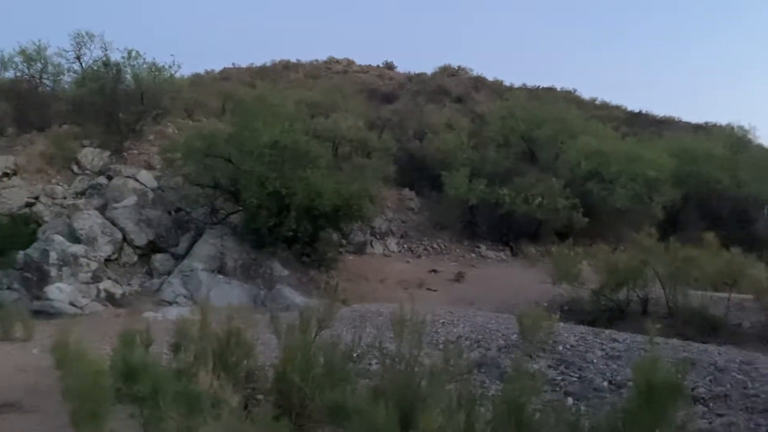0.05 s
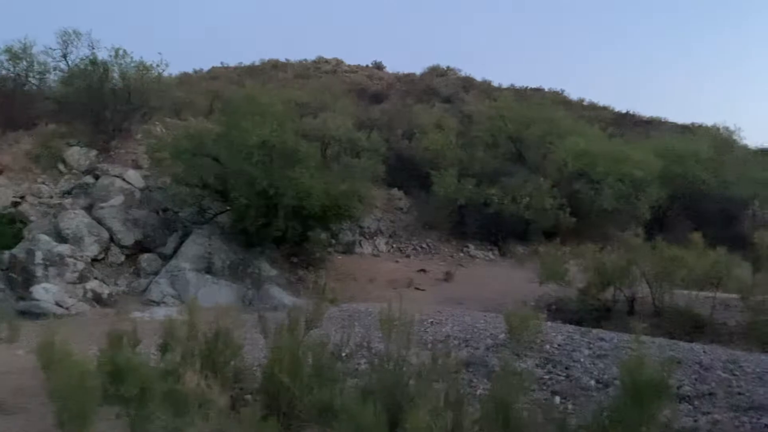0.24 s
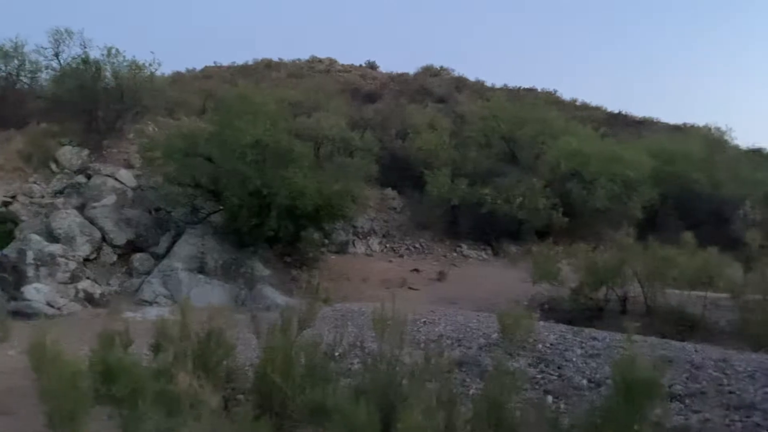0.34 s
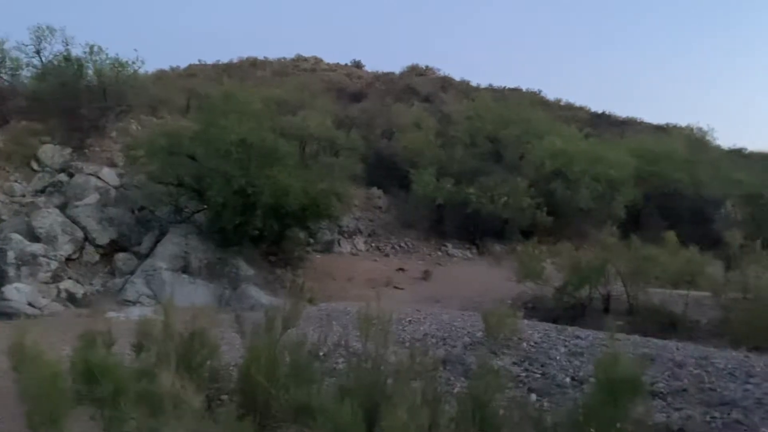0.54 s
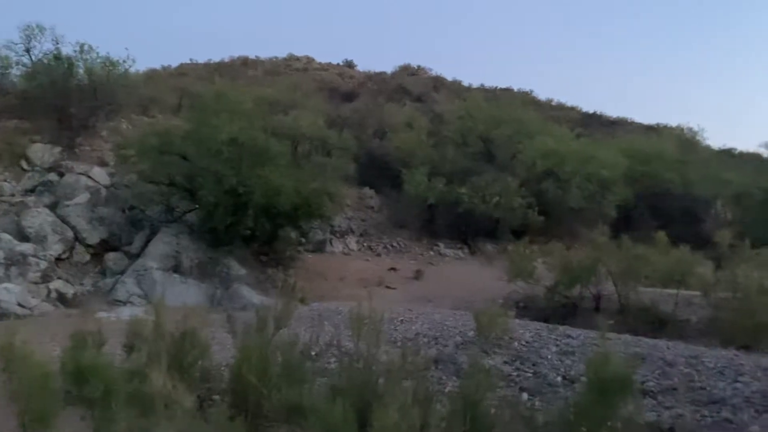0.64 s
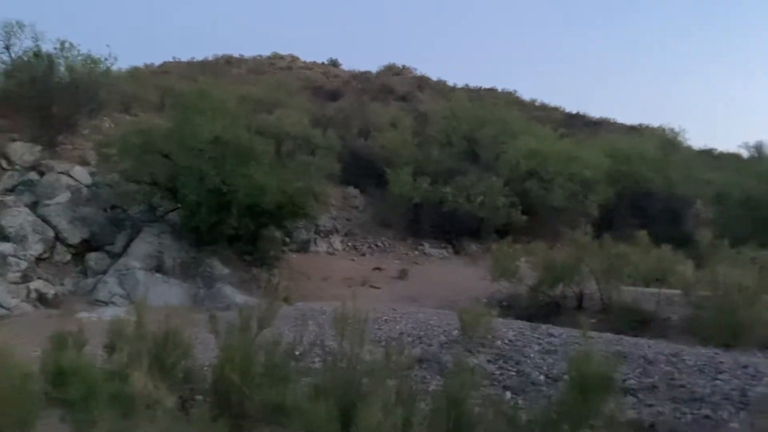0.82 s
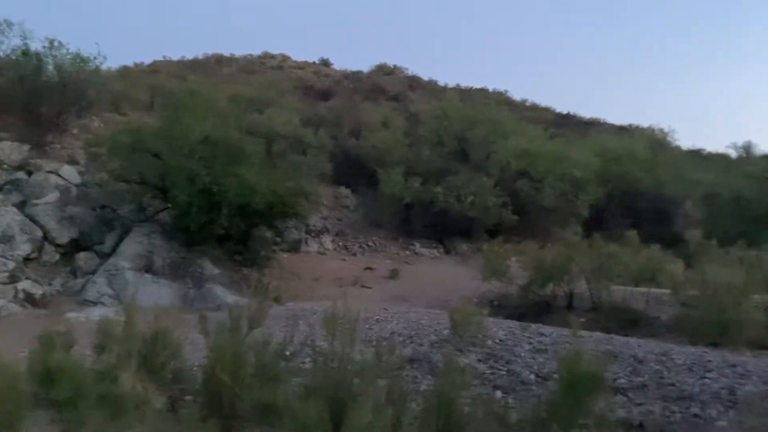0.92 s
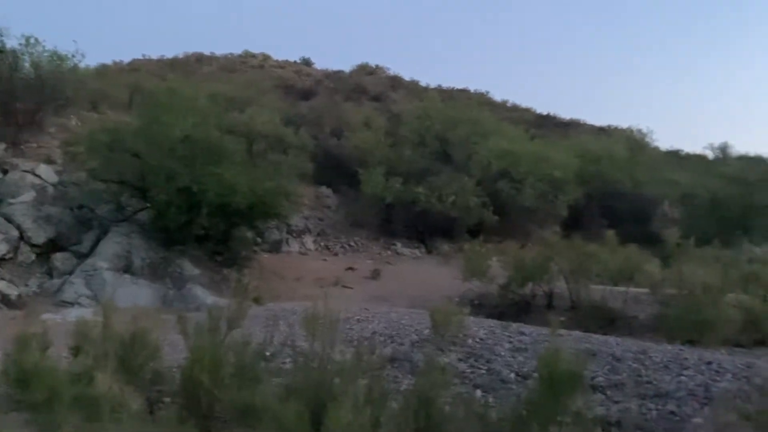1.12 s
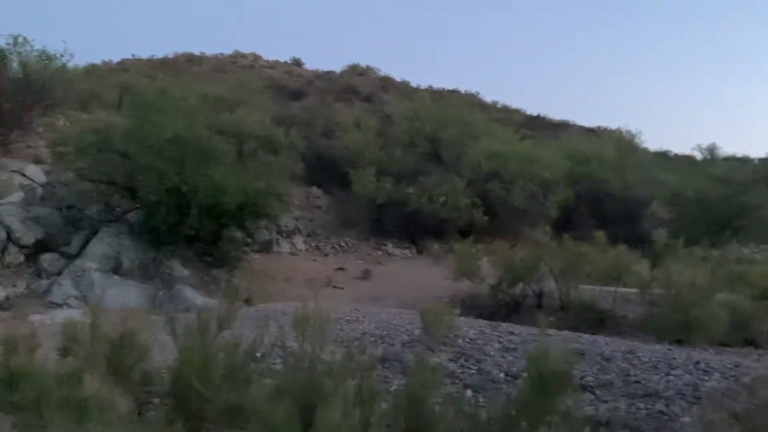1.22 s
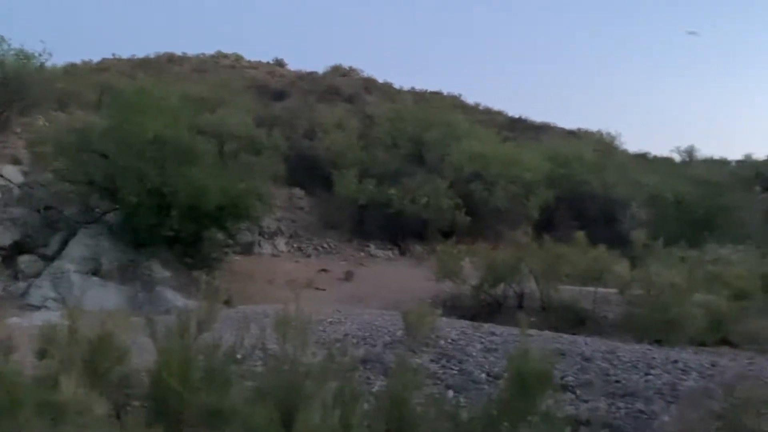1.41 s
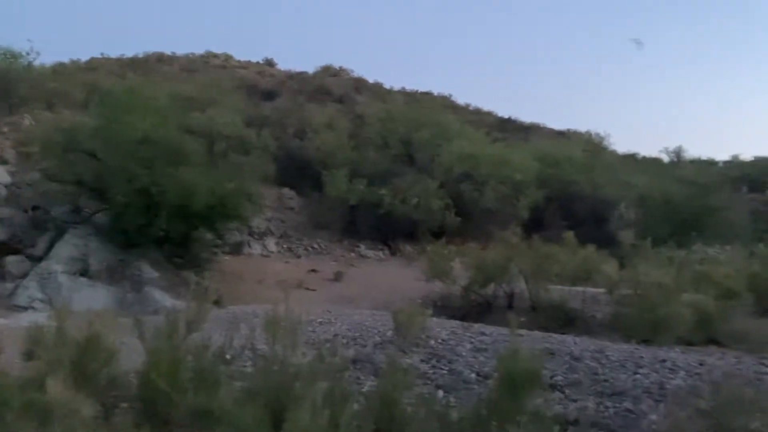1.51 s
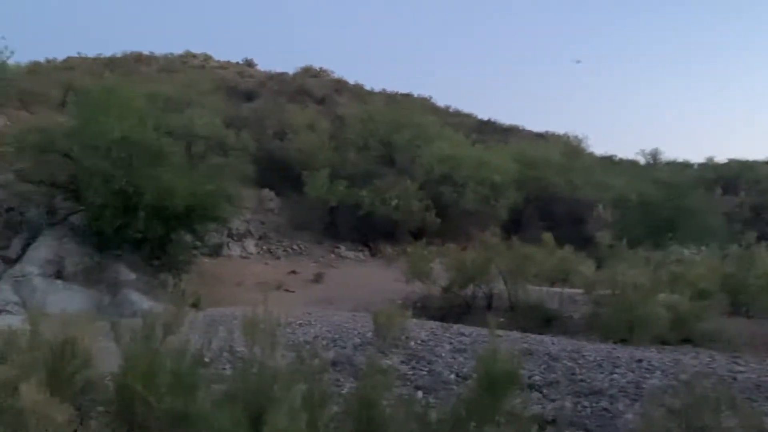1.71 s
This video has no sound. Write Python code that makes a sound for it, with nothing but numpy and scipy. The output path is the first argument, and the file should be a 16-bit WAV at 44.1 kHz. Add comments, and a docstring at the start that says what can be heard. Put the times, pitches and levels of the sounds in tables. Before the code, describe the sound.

Low rumble and dull bumps of a hand-held microphone, with a faint distant nightjar whistling short notes

```python
"""Low rumble and soft bumps of a turning hand-held microphone run throughout, over faint still air, at dusk on a
desert hillside. A nightjar some way off whistles short gliding tones that deepen from a downward slur into
a V, then three chirps that mainly rise; delayed copies and decaying noise give the echoes of rocks and scrub.
Enveloped noise bands make faint high ticks (insects or a bat) and scuffs; the knocks are short sagging sines
with rubbing noise, and one decaying pulse is a snap of the handled case."""
import sys
import numpy as np
from scipy import signal
from scipy.fft import rfft, irfft
from scipy.io import wavfile

SR = 44100
rng = np.random.default_rng(int(sys.argv[2]) if len(sys.argv) > 2 else 0)


def to_wav(sig):
    """Store sig (one row per channel, or 1-D mono) as 16-bit WAV at the path in sys.argv[1].

    Samples outside -1..1 are clipped; the rate is SR.
    """
    pcm = np.clip(np.atleast_2d(sig), -1, 1) * 32767
    pcm = np.round(pcm).astype(np.int16)
    wavfile.write(sys.argv[1], SR, pcm.T)  # frames by channels


N = 77175  # samples

# relative spectrum of the upper rumble, also of the rubbing in the bumps: f/Hz, density/dB per Hz
UPPER_SPECTRUM = [(60, -18.5), (135, 4.5), (210, -1.5), (310, -6.5), (420, -12), (550, -23), (700, -34.5),
                  (1000, -58.5), (2000, -93)]
UPPER_SIDE_DB = -2  # opposed part relative to the shared part


def undb(db):
    """Level definition: an amplitude gain is 10 to the power dB/20."""
    return 10 ** (np.asarray(db) / 20)


def pan(db):
    """Intensity stereo: a level difference places the sound, positive towards the left."""
    return undb(np.array([[db], [-db]]) / 2)


def ease(u):
    """Raised-cosine transition: a smooth step from 0 to 1 as u goes from 0 to 1."""
    return np.sin(np.pi / 2 * np.clip(u, 0, 1)) ** 2


def delay(x, seconds):
    """Propagation delay: the same waveform arrives later, interpolated between samples."""
    return np.interp(np.arange(N) - seconds * SR, np.arange(N), x, left=0)


def lowpass(x, hz):
    """Fourth-order Butterworth filtering: attenuation grows steeply above the cutoff."""
    return signal.sosfilt(signal.butter(4, hz, fs=SR, output="sos"), x)


def waver(hz):
    """Band-limited random modulation: low-passed noise of standard deviation 1."""
    y = lowpass(rng.standard_normal(N), hz)
    return y / y.std()


def noise(spectrum):
    """Spectral shaping: white noise weighted by (f/Hz, level/dB) points, scaled to rms 1."""
    hz, db = np.array(spectrum).T
    f = np.maximum(np.arange(N // 2 + 1) * SR / N, 1)
    gain = undb(np.interp(np.log(f), np.log(hz), db))
    y = irfft(rfft(rng.standard_normal(N)) * gain, N)
    return y / y.std()


def wide(spectrum, side_db):
    """Partial interchannel correlation: a shared noise plus one of opposite sign in the two channels."""
    shared = noise(spectrum)
    opposed = noise(spectrum) * np.array([[1], [-1]])
    return shared + undb(side_db) * opposed


def still_air():
    """Stationary broadband noise: a faint diffuse background of constant level."""
    # relative spectrum: f/Hz, density/dB per Hz
    air_spectrum = [(100, 1), (400, 7), (800, -2), (1400, -8.5), (2500, -10.5), (4000, -15), (7500, -18),
                    (9000, -28), (10500, -17), (12000, -18.5), (13500, -31), (16000, -51)]
    return undb(-80) * wide(air_spectrum, side_db=-1)


def rumble(t):
    """Amplitude-modulated noise: air and handling excite a deep band and a fluttering upper band."""
    # level curves before the band trims: t/s, deep level/dB, upper level/dB
    level_curves = [(0.0, -54.5, -59), (0.146, -61.5, -78.5), (0.218, -48.5, -44.5), (0.34, -45.5, -61),
                    (0.588, -42.5, -35.5), (0.74, -35.5, -44), (0.774, -51, -28.5), (0.876, -36.5, -34),
                    (0.964, -54.5, -78.5), (1.008, -41.5, -49), (1.282, -56, -87), (1.316, -62, -55),
                    (1.334, -48, -79), (1.394, -79, -84), (1.48, -41, -68), (1.516, -59.5, -83.5),
                    (1.68, -47.5, -66.5), (1.75, -50, -66)]
    # relative spectrum of the deep band: f/Hz, density/dB per Hz
    deep_spectrum = [(15, -24.5), (28, -11.5), (50, 12), (90, 6.5), (140, -4.5), (250, -15.5), (500, -68)]
    deep_trim_db, upper_trim_db = -1, -7
    flutter_db, flutter_hz = 4.5, 45.8  # standard deviation and highest rate

    s, deep_db, upper_db = np.array(level_curves).T
    flutter = flutter_db * waver(flutter_hz)
    deep_gain = undb(np.interp(t, s, deep_db) + deep_trim_db)
    upper_gain = undb(np.interp(t, s, upper_db) + upper_trim_db + flutter)
    deep = pan(1.5) * deep_gain * wide(deep_spectrum, side_db=-5.5)
    return deep + upper_gain * wide(UPPER_SPECTRUM, UPPER_SIDE_DB)


def bumps(t):
    """Damped transient oscillation: each dull knock of the hand swells, sags in pitch and dies away."""
    # knocks: onset t/s, level before the low-pass/dB, initial f/Hz, swell time/s, left-right/dB
    knocks = [(.028, -49, 178, .003, -2), (.211, -36.5, 198, 0.0022, -1), (0.224, -44.5, 141, 0.0029, -4),
              (0.268, -42.5, 62.6, 0.0052, -4), (.272, -42.5, 277, 0.0023, 0.5),
              (0.434, -39.5, 123, 0.004, 7.5), (.493, -40, 393, .0025, -2.5), (.561, -31, 89, 0.0041, -1),
              (.609, -35, 403, .003, 2), (.628, -31, 133, 0.0035, -1), (.771, -26, 395.5, 0.00094, 8),
              (0.7787, -18.5, 190, 0.0011, 1.5), (0.793, -24, 199, 0.0041, 0.5),
              (.814, -26.5, 140, .004, -3.5), (.827, -27.5, 400, 0.0014, 4),
              (0.847, -26, 159, 0.0042, -0.5), (.866, -35, 399, 0.0011, 4), (0.872, -27, 98.7, 0.0038, 4),
              (0.899, -41, 373, 0.0014, 2), (.998, -30, 259, 0.0021, 1), (1.042, -31, 216, 0.0021, -0.5),
              (1.092, -38, 233, 0.0018, -3), (1.113, -39.5, 150, 0.0028, 5.5),
              (1.144, -39.5, 104, 0.0035, 5.5), (1.178, -42.5, 171, 0.0027, -2),
              (1.317, -37, 70.2, .006, 5), (1.465, -42, 158.6, 0.0026, 6), (1.478, -46.5, 63.6, 0.006, 20),
              (1.553, -49, 142, 0.0042, 3.5), (1.684, -43.5, 238, .003, 7)]
    sag = 0.13  # pitch falls as 1 / (1 + sag * u)
    grit_db, grit_reach = -11.5, 1.68  # rubbing: level before filtering, cutoff as a multiple of initial pitch
    top_hz = 756

    out = np.zeros((2, N))
    grit = undb(grit_db) * wide(UPPER_SPECTRUM, UPPER_SIDE_DB)
    for start, db, hz, swell_s, side_db in knocks:
        u = np.maximum(t - start, 0) / swell_s
        cycles = hz * swell_s * np.log1p(sag * u) / sag  # integral of the sagging pitch
        knock = np.sin(2 * np.pi * cycles) + lowpass(grit, grit_reach * hz)
        envelope = (u / 2) ** 2 * np.exp(2 - u)  # peaks at 1 after two swell times
        out += pan(side_db) * undb(db) * envelope * knock
    return lowpass(out, top_hz)


def scuffs(t):
    """Decaying band noise: each faint brushing sound is a puff centred on one frequency."""
    # puffs: onset t/s, level/dB, centre f/Hz, decay time constant/s
    puffs = [(.201, -73, 1680, 0.0059), (0.2, -80, 3380, 0.0032), (1.173, -81.5, 1140, 0.03),
             (1.21, -77.5, 930, 0.018), (1.305, -75.5, 1230, 0.018)]
    attack_s = 0.002
    out = np.zeros((2, N))
    for start, db, hz, decay_s in puffs:
        u = np.maximum(t - start, 0)
        envelope = ease(u / attack_s) * np.exp(-u / decay_s)
        band = [(hz / 2, -25), (hz, 0), (2 * hz, -30)]
        out += undb(db) * envelope * wide(band, side_db=5)
    return out


def click(t):
    """Impulsive excitation: one snap of the handled case jumps at once and decays exponentially."""
    start, decay_s, level_db = 0.5733, 0.0008, -41
    pulse = (t >= start) * np.exp(-np.abs(t - start) / decay_s)
    return pan(6.8) * undb(level_db) * pulse


def ticks(t):
    """Double exponential decay: each thin high noise burst leaves a weaker, longer diffuse tail."""
    # bursts: onset t/s, level/dB, centre f/Hz, decay time constant/s
    bursts = [(0.599, -80, 10300, .004), (0.618, -72, 10900, 0.0018), (.709, -77.5, 10800, .004),
              (.725, -74, 14900, .003), (.7274, -71, 10800, .002), (.845, -69, 11150, 0.0021),
              (.9642, -85.5, 11260, 0.0094), (1.072, -73, 11600, 0.0079), (1.0914, -55, 10800, 0.0018),
              (1.216, -72, 11300, 0.0026), (1.3174, -70, 10800, 0.0022), (1.423, -78.5, 10500, 0.0033)]
    # relative spectrum of every burst: multiple of the centre f, density/dB per Hz
    burst_spectrum = [(.3, -35.5), (0.551, -19), (.82, -19), (.94, -2.5), (1.07, 0), (1.19, -17.5),
                      (1.45, -32.5)]
    attack_s, tail_decay_s, tail_db = 0.0013, 0.024, -24  # tail level is relative to the burst

    out = np.zeros((2, N))
    for start, db, hz, decay_s in bursts:
        u = np.maximum(t - start, 0)
        colour = [(multiple * hz, level) for multiple, level in burst_spectrum]
        tail = undb(tail_db) * np.exp(-u / tail_decay_s) * wide(colour, side_db=0.5)
        burst = np.exp(-u / decay_s) * wide(colour, side_db=-2)
        out += undb(db) * ease(u / attack_s) * (burst + tail)
    return out


def nightjar(t):
    """Frequency modulation: a nearly pure whistle glides to a turning pitch and on to its end pitch."""
    # notes: onset t/s, slide to the turn/s, slide after it/s, start f/Hz, turning f/Hz, end f/Hz,
    # mid-note level/dB, left-right/dB
    notes = [(0.027, 0.016, .006, 1760, 1500, 1600, -72, -4),
             (0.157, 0.017, 0.0027, 1845, 1490, 1490, -69.5, -3),
             (.284, .015, 0.0056, 2135, 1468, 1590, -69, -1),
             (0.4, 0.016, 0.0072, 2300, 1490, 1570, -68, -1.5),
             (0.505, 0.017, 0.01, 2580, 1600, 1730, -66.5, -2.5),
             (0.589, 0.02, .014, 2743, 1630, 2050, -63, -1),
             (0.697, 0.023, .017, 2840, 1690, 2050, -62, -2),
             (0.811, 0.026, 0.014, 2783, 1620, 2110, -62.5, -0.5),
             (0.933, .021, 0.021, 2797, 1656, 2160, -64, -2),
             (1.043, 0.024, 0.0043, 2850, 1882, 2030, -66.5, 1.5),
             (1.12, .018, 0.0062, 1652, 2285, 2460, -67.5, -2.5),
             (1.240, .019, 0.018, 2676, 3376, 3000, -73.5, 6),
             (1.31, .012, 0.011, 1700, 2216, 2280, -71.5, 0)]
    attack_s, release_s, right_lag_s = 0.0041, 0.0022, 0.00006
    crescendo_db, overtone_db = 1.5, -33.5  # growth over each note; second harmonic re the first
    pitch_spread, waver_hz = 0.015, 252  # standard deviation as a share of pitch, highest rate

    out = np.zeros((2, N))
    unsteady = 1 + pitch_spread * waver(waver_hz)
    for start, fall_s, tail_s, start_hz, turn_hz, end_hz, db, side_db in notes:
        u = t - start
        length_s = fall_s + tail_s
        first_slide = (turn_hz - start_hz) * ease(u / fall_s)
        second_slide = (end_hz - turn_hz) * ease((u - fall_s) / tail_s)
        hz = start_hz + first_slide + second_slide
        swell = ease(u / attack_s) * ease((length_s - u) / release_s)
        swell = swell * undb(crescendo_db * (ease(u / length_s) - .5))
        phase = 2 * np.pi * np.cumsum(hz * unsteady * (u > 0)) / SR
        whistle = np.sin(phase) + undb(overtone_db) * np.sin(2 * phase)
        out += pan(side_db) * undb(db) * swell * whistle
    return np.array([out[0], delay(out[1], right_lag_s)])


def hillside(x, t):
    """Reflection and scattering: ground and near rocks echo; scrub and the far slope reverberate."""
    # reflections: delay/s, level re direct sound/dB
    echoes = [(.0042, -5), (.0059, -14), (.0098, -20), (.0155, -22), (.027, -23)]
    # scattering strength against pitch: f/Hz, level/dB
    scatter_spectrum = [(1000, -15.5), (1450, -8.5), (1900, 2), (2600, 0), (3400, -0.5), (6000, -8.5)]
    # scrub, then far slope: level before colouring/dB, time to decay by 60 dB/s
    reverberation = ((-5, 0.12), (-12, 0.47))

    out = x + sum(undb(db) * np.array([delay(c, s) for c in x]) for s, db in echoes)
    hz, colour_db = np.array(scatter_spectrum).T
    f = np.arange(N + 1) * SR / (2 * N)
    colour = undb(np.interp(np.log1p(f), np.log(hz), colour_db))
    for db, t60 in reverberation:
        decay = np.exp(-np.log(1000) * t / t60)
        response = rng.standard_normal((2, N)) * decay * ease(t / .004)
        response /= np.sqrt(np.sum(response ** 2, axis=1, keepdims=True))  # unit energy
        # convolution, zero-padded so that it does not wrap round
        scattered = irfft(rfft(x, 2 * N) * rfft(response, 2 * N) * colour)[:, :N]
        out = out + undb(db) * scattered
    return out


def scene():
    """Linear superposition: the outdoor sounds and the handling noise add."""
    t = np.arange(N) / SR
    handling = rumble(t) + bumps(t) + scuffs(t) + click(t)
    outdoors = still_air() + ticks(t) + hillside(nightjar(t), t)
    return outdoors + handling


def record(dry):
    """Band limitation: the recorder's elliptic low-pass removes the top of the spectrum."""
    top_hz, ripple_db, stop_db = 15900, .2, 70
    return signal.sosfilt(signal.ellip(8, ripple_db, stop_db, top_hz, fs=SR, output="sos"), dry)


dry = scene()
out = record(dry)
to_wav(out)
```